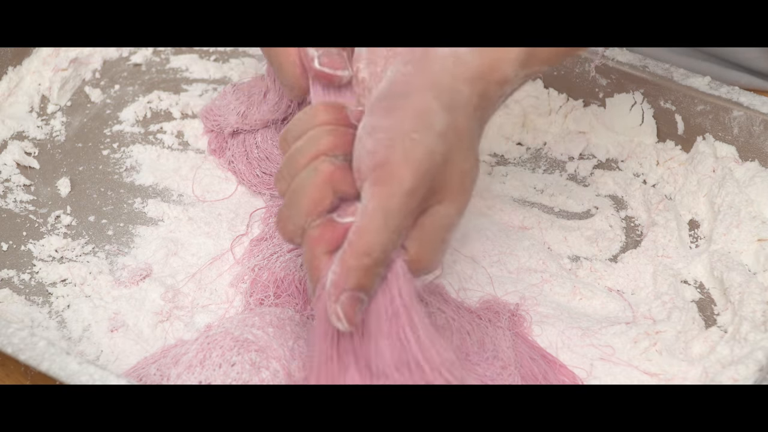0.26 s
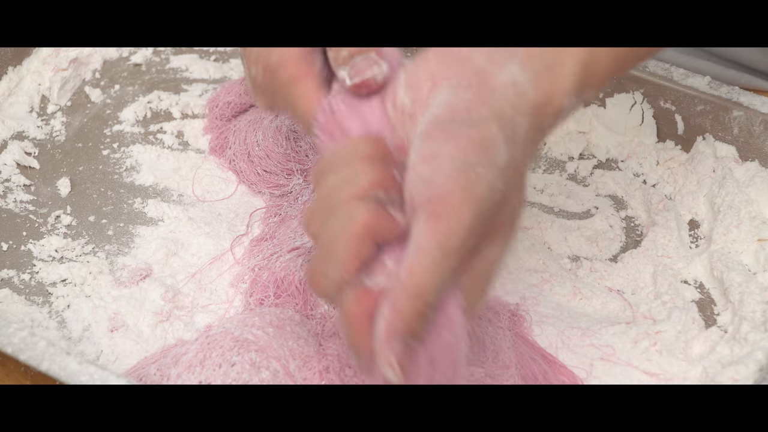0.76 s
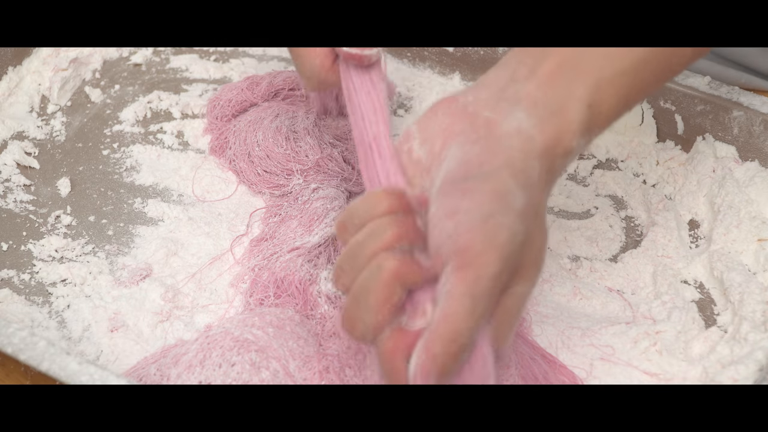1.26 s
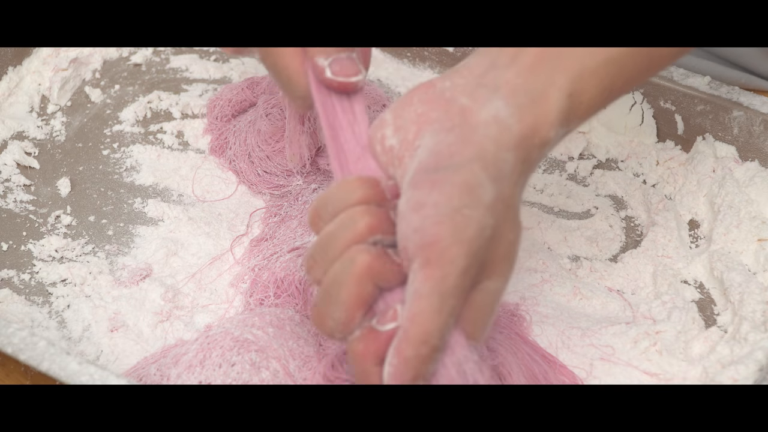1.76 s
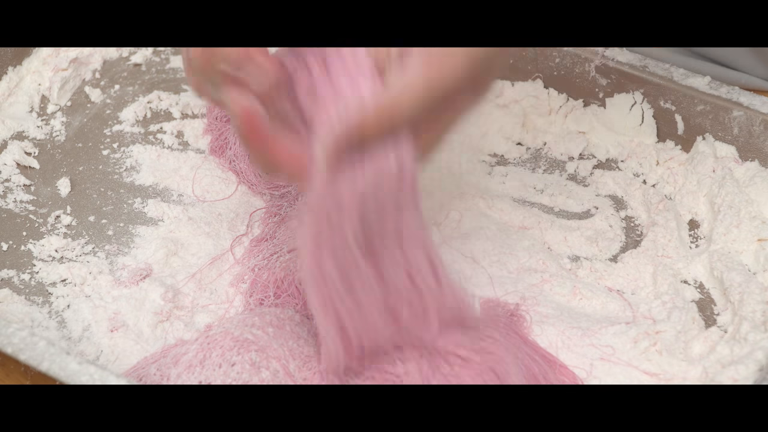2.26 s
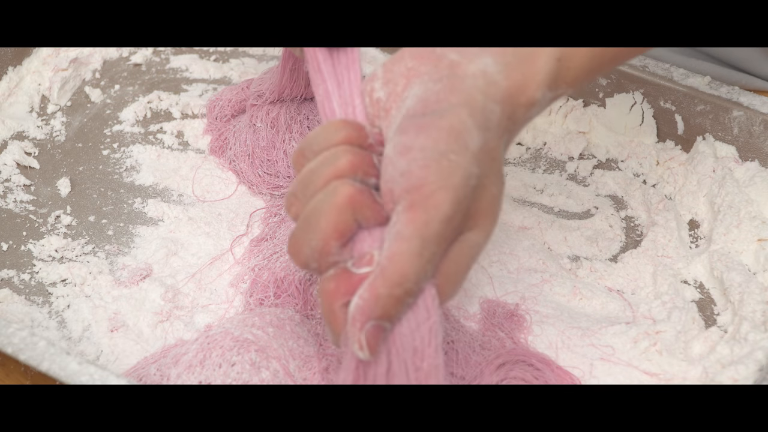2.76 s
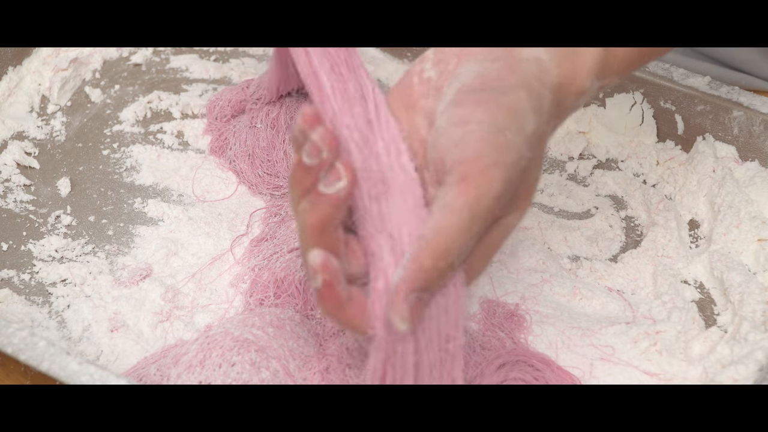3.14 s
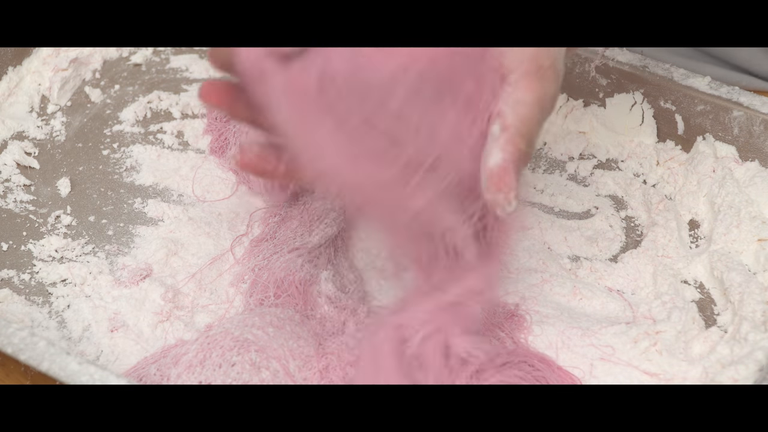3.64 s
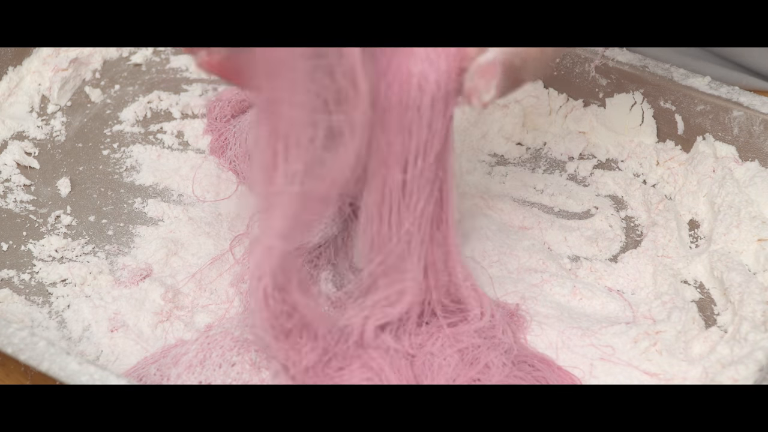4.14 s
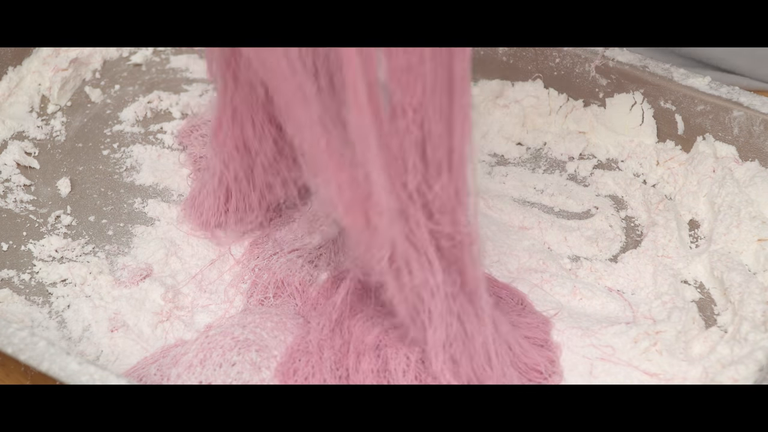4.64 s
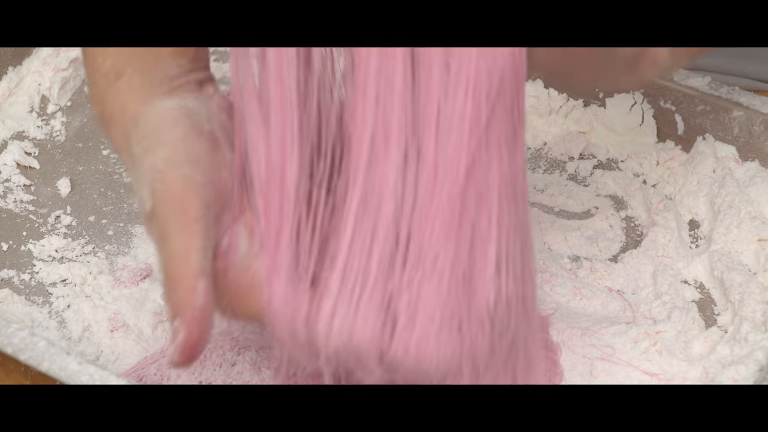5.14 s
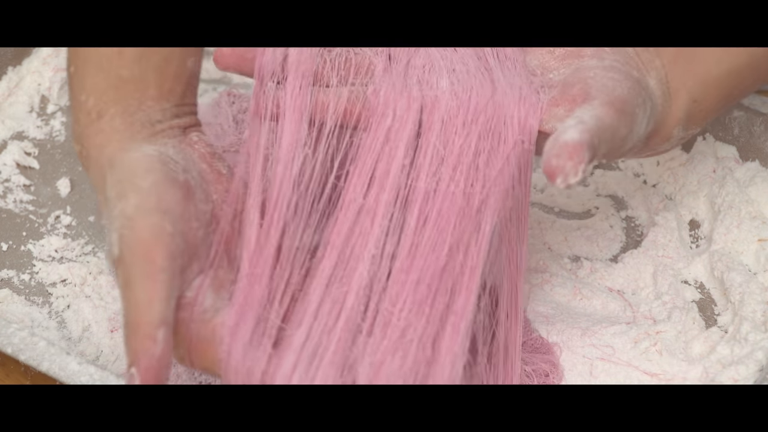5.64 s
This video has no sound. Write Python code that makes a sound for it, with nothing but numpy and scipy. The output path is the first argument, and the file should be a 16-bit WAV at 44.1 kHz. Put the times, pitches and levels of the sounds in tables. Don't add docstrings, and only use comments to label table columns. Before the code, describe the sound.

A quiet indoor kitchen heard closely in mono, with low, soft air and faint mains hum throughout. Hands work fine sugar strands in dry starch: a small tap at 0.07 s, then a sudden bright rub and powdery swish at 0.4 s fading by 0.7. Faint distant bird whistles flutter from 0.7 to 1.2 s with a soft echo. More hissy strokes cluster at 1.5-1.75 s, slightly hollow and squeaky, ending in a clear knuckle tick near 1.8. Another rustling group runs 2.2-2.65 s, with two light taps at its end. At 2.8 s a nearby bird outside dominates: a buzzing trill around 3.6 kHz, then a lower one near 2.8 kHz until 3.2, reverberating about a second. A sharp, dry snap lands at 3.52 s. Gentle swishes and soft air thumps continue around 3.9-4.5 s, then nearly nothing but faint dull scraping, a tiny tap at 5.4 and slightly rising hum.

```python
import sys
import numpy as np
from scipy import signal
from scipy.fft import rfft, irfft
from scipy.io import wavfile
from scipy.ndimage import map_coordinates

SR = 44100
rng = np.random.default_rng(int(sys.argv[2]) if len(sys.argv) > 2 else 0)


def makeup_ratio(level_db):
    decades = np.asarray(level_db, float) / 20
    return 10 ** decades


def to_wav(sig):
    pcm = np.clip(np.atleast_2d(sig), -1, 1) * 32767
    pcm = np.round(pcm).astype(np.int16)
    wavfile.write(sys.argv[1], SR, pcm.T)


N = 260631

# (frequency [Hz], density [dB per Hz])
ROOM_SPECTRUM = [(15, -35), (28, -15), (45, -3), (80, -2), (160, -1), (250, -2.5), (340, -5.5),
                 (480, -12.5), (700, -16), (1200, -16.5), (2200, -22.5), (4500, -24.5), (8000, -27.5),
                 (16000, -32)]
ROOM_DB = -60.5
# (time [s], level [dB])
ROOM_DRIFT = [(0.0, -68.5), (0.28, -71), (0.57, -64.5), (1.36, -68), (1.71, -61), (1.89, -67), (3.26, -67),
              (3.56, -62.5), (4.79, -66), (5.27, -68.5), (5.53, -66.5), (5.91, -70)]
# (frequency [Hz], width [Hz], level [dB])
HUM_LINES = [
    (51.6, 10.4, -67.5),
    (100.2, 5.1, -68),
    (150, 7.2, -75.5),
    (5300, 120, -89.5),
]
# (time [s], level [dB])
HUM_SWELL = [(0, -1.5), (2, 0), (4.5, -0.5), (4.9, 3), (5.91, 4.5)]

# (frequency [Hz], density [dB per Hz])
DRAG_SPECTRUM = [(200, -120), (300, -6), (450, 3.5), (750, 0), (1100, -5), (1500, -120)]
# (peak time [s], level [dB], rise over 10 dB [s], fall over 10 dB [s])
DRAGS = [(-0.01, -66.7, 0.1, 0.202), (0.449, -62.7, 0.115, 0.092), (0.621, -67.5, 0.029, 0.126),
         (0.854, -65.2, 0.059, 0.212), (1.333, -68.6, 0.031, 0.2), (1.805, -64.0, 0.293, 0.052),
         (1.931, -70.2, 0.117, 0.197), (2.25, -68.7, 0.113, 0.258), (2.56, -66.9, 0.176, 0.199),
         (3.021, -70.9, 0.106, 0.15), (3.562, -69.1, 0.193, 0.314), (4.156, -67.4, 0.124, 0.085),
         (4.655, -71.5, 0.3, 0.044), (4.998, -68.2, 0.239, 0.319), (5.362, -70.9, 0.05, 0.315)]

# (frequency [Hz], density [dB per Hz])
HISS_SPECTRUM = [(4500, -120), (5500, -16), (6800, 1), (9000, 3), (12500, 1), (15000, 1), (16000, -8)]
# (frequency [Hz], density [dB per Hz])
RUB_SPECTRUM = [(2500, -120), (3000, -5.5), (4200, 0), (5300, -2), (6300, -6.5), (7500, -18), (9000, -120)]
# (frequency [Hz], density [dB per Hz])
RUSTLE_SPECTRUM = [(500, -120), (800, -21), (1200, -10), (1600, -2), (2200, 0), (2800, -2.5), (3400, -11.5),
                   (4200, -120)]
# (peak time [s], level [dB], rise over 10 dB [s], fall over 10 dB [s])
PULLS = [(0.034, -61.9, 0.035, 0.036), (0.152, -70.7, 0.089, 0.107), (0.4, -45.7, 0.042, 0.03),
         (0.5, -58.8, 0.16, 0.013), (0.663, -68.2, 0.112, 0.008), (0.904, -63.0, 0.15, 0.069),
         (0.993, -67.2, 0.024, 0.073), (1.092, -74.4, 0.05, 0.214), (1.353, -62.2, 0.042, 0.073),
         (1.456, -67.4, 0.037, 0.123), (1.663, -63.1, 0.016, 0.192), (1.764, -60.3, 0.022, 0.007),
         (1.933, -78.2, 0.355, 0.405), (2.219, -63.6, 0.059, 0.033), (2.289, -66.5, 0.033, 0.104),
         (2.496, -59.8, 0.026, 0.048), (2.585, -53.7, 0.02, 0.013), (2.654, -69.8, 0.151, 0.199),
         (2.856, -73.2, 0.055, 0.183), (2.998, -56.9, 0.052, 0.032), (3.067, -67.2, 0.19, 0.076),
         (3.334, -65.3, 0.015, 0.071), (3.569, -66.0, 0.095, 0.048), (3.663, -69.8, 0.353, 0.2),
         (3.973, -68.8, 0.051, 0.097), (4.144, -70.3, 0.121, 0.148), (4.304, -76.1, 0.011, 0.014),
         (4.777, -70.1, 0.025, 0.02), (4.949, -73.3, 0.381, 0.45), (5.317, -84.2, 0.378, 0.109)]
# (peak time [s], level [dB], rise over 10 dB [s], fall over 10 dB [s])
SWISHES = [(0.396, -46.5, 0.009, 0.114), (0.516, -54.2, 0.063, 0.074), (0.63, -62.6, 0.069, 0.007),
           (0.673, -59.8, 0.077, 0.059), (0.8, -65.2, 0.038, 0.031), (0.915, -71.6, 0.072, 0.064),
           (1.007, -67.7, 0.009, 0.039), (1.462, -63.2, 0.127, 0.147), (1.523, -52.2, 0.009, 0.026),
           (1.644, -49.7, 0.072, 0.013), (1.711, -53.5, 0.059, 0.086), (2.213, -60.9, 0.008, 0.106),
           (2.28, -60.5, 0.019, 0.095), (2.389, -53.2, 0.099, 0.018), (2.453, -54.7, 0.037, 0.039),
           (2.549, -55.6, 0.081, 0.054), (3.05, -62.2, 0.024, 0.075), (3.281, -58.1, 0.056, 0.03),
           (3.378, -57.8, 0.025, 0.029), (3.503, -66.3, 0.024, 0.047), (3.626, -62.8, 0.075, 0.033),
           (3.741, -63.1, 0.034, 0.052), (3.908, -56.8, 0.02, 0.018), (3.972, -60.0, 0.032, 0.034),
           (4.087, -54.5, 0.011, 0.018), (4.207, -67.4, 0.267, 0.157), (4.364, -68.5, 0.03, 0.013),
           (4.537, -57.6, 0.032, 0.048), (4.776, -66.9, 0.007, 0.162), (5.928, -67.9, 0.099, 0.01)]
STROKE_ROUND = 1.67

# (time [s], peak level [dB], knock above it [dB], tick frequency [Hz])
TAPS = [(.0678, -44.5, -4, 1900), (0.2899, -45, -22, 1950), (1.7852, -36.5, -9.5, 1700),
        (1.975, -50, -25, 2200), (1.9943, -45, -20, 2300), (2.073, -68, -8, 1200), (2.571, -40, -18, 2360),
        (2.6178, -37, -10.5, 1750), (5.41, -60, -1, 1390)]
# (start [s], end [s], open [Hz], closed [Hz], level over the pull [dB])
CLOSINGS = [(.42, .55, 2300, 2800, 2.5), (1.42, 1.59, 2000, 1960, 5), (1.6, 1.79, 1950, 2580, 5.5),
            (1.79, 1.93, 1150, 1400, 4), (2.19, 2.62, 1750, 2250, 2.5), (2.93, 3.04, 1900, 2400, 3),
            (3.53, 3.75, 1800, 1500, 1.5), (4.82, 5.06, 1500, 2500, -.5)]
# (time [s], peak level [dB], frequency [Hz])
PUFFS = [(0.491, -61, 35), (.86, -52, 60), (1.519, -47.5, 65), (1.64, -52, 45.4), (2.346, -47, 49.6),
         (3.511, -57, 45), (3.905, -48.5, 64.4), (4.077, -42, 80), (4.28, -49, 60.5)]

# (time [s], length [s], start pitch [Hz], end pitch [Hz], level [dB])
WHISTLES = [(.725, 0.034, 3330, 3510, -61), (.77, .07, 3460, 3460, -64), (0.728, 0.024, 3900, 4020, -62),
            (0.845, .02, 2850, 2940, -59), (.855, 0.052, 3030, 3240, -54), (.89, 0.05, 3550, 3770, -61),
            (0.923, .05, 3720, 3600, -59), (.915, 0.054, 3520, 3430, -58), (0.911, .03, 2890, 2950, -60),
            (.94, 0.043, 3300, 3054, -55.5), (.985, 0.052, 3280, 2950, -63), (1.045, 0.04, 2920, 2590, -58),
            (1.045, .025, 2920, 2890, -58), (1.1, .03, 3200, 3170, -65), (1.096, 0.03, 2570, 2780, -62),
            (1.12, 0.06, 2770, 2720, -63), (1.124, 0.085, 2230, 2320, -70), (4.86, .04, 2650, 2500, -68),
            (5.06, 0.11, 3740, 3700, -68)]
# (time [s], pitch [Hz], level [dB], trill swing [Hz])
HIGH_NOTE = [(2.74, 3370, -100, 50), (2.752, 3380, -46, 60), (2.77, 3430, -38, 80), (2.79, 3507, -32, 121),
             (2.822, 3650, -24, 230), (2.86, 3657, -27, 255), (2.90, 3600, -31.5, 218),
             (2.94, 3680, -37.5, 180), (2.96, 3680, -100, 180)]
# (time [s], pitch [Hz], level [dB], trill swing [Hz])
UNDER_NOTE = [(2.75, 2750, -100, 150), (2.77, 2750, -46, 230), (2.80, 2800, -39.5, 290),
              (2.85, 2830, -40.5, 340), (2.89, 2980, -43, 330), (2.92, 3050, -100, 250)]
# (time [s], pitch [Hz], level [dB], trill swing [Hz])
LOW_NOTE = [(2.93, 2680, -100, 150), (2.955, 2670, -38, 150), (2.99, 2720, -35.5, 190),
            (3.03, 2850, -29, 200), (3.08, 2860, -28.5, 180), (3.14, 2840, -28.5, 171),
            (3.18, 2780, -29, 170), (3.21, 2723, -32.5, 170), (3.235, 2700, -100, 139.5)]
YARD_T60 = [
    0.97,
    0.96,
    0.78,
]

# (time [s], frequency [Hz], level [dB], decay by 60 dB [s])
SNAP = [(3.5213, 5200, -22, .003), (3.5216, 8710, -23, .002), (3.5213, 13500, -32, .002),
        (3.5214, 1750, -34, .006), (3.5219, 4300, -20.5, .005), (3.5223, 6400, -23.5, .003),
        (3.5227, 12500, -36, .002), (3.5220, 2700, -25.5, .007), (3.5222, 1750, -21.5, 0.0083),
        (3.5224, 480, -38, .014)]


def unit(x):
    return x / np.sqrt(np.mean(x ** 2) + 1e-20)


def curves(rows):
    s, *cols = np.transpose(rows)
    return [np.interp(np.arange(N) / SR, s, c) for c in cols]


def wobble(rate):
    knots = rng.standard_normal(N // 20)
    return map_coordinates(knots, [np.arange(N) * rate / SR])


def coloured(x, points):
    f, db = np.transpose(points)
    hz = np.fft.rfftfreq(N, 1 / SR)
    gain = makeup_ratio(np.interp(np.log(hz + 1), np.log(f), db, -120, -120))
    return unit(irfft(rfft(x) * gain, N))


def add(track, s, sound):
    part = track[round(s * SR):][:len(sound)]
    part += sound[:len(part)]


def ring(hz, t60, t):
    build_up = 1 - np.exp(-1.6 * hz * t)
    return makeup_ratio(-60 * t / t60) * build_up * np.sin(2 * np.pi * hz * t)


def grit(rough_db, clump_db):
    return rng.standard_normal(N) * makeup_ratio(rough_db * wobble(1500) + clump_db * wobble(40))


def swells(rows):
    t = np.arange(N // 32 + 2) * 32 / SR
    power = np.full(len(t), 1e-12)
    for s, db, rise_s, fall_s in rows:
        distance = np.abs((t - s) / np.where(t < s, rise_s, fall_s))
        power += makeup_ratio(db - 10 * distance ** STROKE_ROUND) ** 2
    return np.interp(np.arange(N) / SR, t, power)


def room_tone():
    drift_db, = curves(ROOM_DRIFT)
    level_db = ROOM_DB + 0.32 * (drift_db - drift_db.mean())
    air = makeup_ratio(level_db) * coloured(rng.standard_normal(N), ROOM_SPECTRUM)
    hz = np.fft.rfftfreq(N, 1 / SR)
    hum = np.zeros(N)
    for centre_hz, width_hz, db in HUM_LINES:
        resonance = 1 / (1 + ((hz - centre_hz) / width_hz) ** 2)
        hum += makeup_ratio(db) * unit(irfft(rfft(rng.standard_normal(N)) * resonance, N))
    swell_db, = curves(HUM_SWELL)
    return air + makeup_ratio(swell_db) * hum


def drag():
    return np.sqrt(swells(DRAGS)) * coloured(grit(rough_db=2.0, clump_db=0.2), DRAG_SPECTRUM)


def strokes():
    pull, swish = swells(PULLS), swells(SWISHES)

    def layer(pull_db, swish_db, clump_db, spectrum):
        envelope = np.sqrt(pull * makeup_ratio(pull_db) ** 2 + swish * makeup_ratio(swish_db) ** 2)
        return envelope * coloured(grit(1.5, clump_db), spectrum)

    flutter = makeup_ratio(0.74 * wobble(25.05))
    hiss = layer(pull_db=0.9, swish_db=1.5, clump_db=1.5, spectrum=HISS_SPECTRUM)
    rub = layer(pull_db=4.6, swish_db=-2.7, clump_db=1.1, spectrum=RUB_SPECTRUM)
    rustle = layer(pull_db=3.3, swish_db=-6.7, clump_db=0.75, spectrum=RUSTLE_SPECTRUM)
    return flutter * (hiss + rub + rustle)


def taps():
    out, t = np.zeros(N), np.arange(SR // 20) / SR
    for s, db, knock_db, hz in TAPS:
        tick = ring(hz, 0.0032, t)
        tick += 0.59 * ring(0.46 * hz, 0.0043, t)
        tick += 0.54 * ring(1.36 * hz, 0.0027, t)
        knock = ring(353, 0.015, t)
        add(out, s, -makeup_ratio(db + 9.5) * tick)
        add(out, s - 0.0006, -makeup_ratio(db + knock_db + 13.5) * knock)
    return out


def cupped_hand():
    out = np.zeros(N)
    noise = np.sqrt(2 * swells(PULLS)) * wobble(550)
    for start, end, open_hz, closed_hz, db in CLOSINGS:
        n = round((end - start) * SR)
        hollow = np.sin(np.cumsum(np.linspace(open_hz, closed_hz, n)) * 2 * np.pi / SR)
        rubbing = noise[round(start * SR):][:n]
        add(out, start, makeup_ratio(db) * np.hanning(n) ** 0.2 * hollow * rubbing)
    return out


def puffs():
    out, t = np.zeros(N), np.arange(SR // 10) / SR
    for s, db, hz in PUFFS:
        u = t * hz * 1.74
        swell = u * np.exp(-u)
        add(out, s, -makeup_ratio(db + 7.5) * swell * np.sin(2 * np.pi * hz * t))
    return out


def whistles():
    out = np.zeros(N)
    for s, length, start_hz, end_hz, db in WHISTLES:
        n = round(length * SR)
        hz = end_hz + (start_hz - end_hz) * np.linspace(1, 0, n) ** 1.6
        tone = np.sin(np.cumsum(hz) * 2 * np.pi / SR)
        add(out, s, makeup_ratio(db) * np.hanning(n) ** 0.4 * tone)
    return out


def trill(note, rate_hz, pulse, waver):
    hz, db, swing_hz = curves(note)
    shake = np.cumsum(rate_hz * (1 + 0.22 * wobble(60))) * 2 * np.pi / SR
    pitch_hz = hz + swing_hz * (np.sin(shake) + waver * wobble(120))
    phase = np.cumsum(pitch_hz) * 2 * np.pi / SR
    voice = np.sin(phase) + makeup_ratio(-40.5) * np.sin(2 * phase)
    return makeup_ratio(db) * (1 + pulse * np.cos(shake)) * voice


def yard(x, t60, direct_db):
    t = np.arange(SR * 3 // 2) / SR
    build_up = 1 - np.exp(-t / 0.0067)
    tail = rng.standard_normal(len(t)) * makeup_ratio(-60 * t / t60) * build_up
    echo = signal.fftconvolve(x, tail / np.linalg.norm(tail))[:N]
    return echo + makeup_ratio(direct_db) * x


def birds():
    high = trill(HIGH_NOTE, 110, pulse=0.48, waver=0.2)
    high += trill(UNDER_NOTE, 110, pulse=0.35, waver=0.32)
    low = trill(LOW_NOTE, 80, pulse=0.3, waver=0.4)
    high_t60, low_t60, far_t60 = YARD_T60
    return yard(high, high_t60, -5.5) + yard(low, low_t60, -6) + yard(whistles(), far_t60, -2)


def snap():
    out, t = np.zeros(N), np.arange(SR // 40) / SR
    for s, hz, db, t60 in SNAP:
        add(out, s, makeup_ratio(db) * ring(hz, t60, t))
    return out


def scene():
    hands = drag() + strokes() + taps() + cupped_hand() + puffs() + snap()
    return (room_tone() + hands + birds())[None]


def low_pass(x):
    return signal.sosfilt(signal.butter(12, 16660, fs=SR, output="sos"), x)


def record(dry):
    passed = np.fft.rfftfreq(N, 1 / SR) < 15790
    kept = irfft(rfft(dry) * passed, N)
    return low_pass(kept)


dry = scene()
out = record(dry)
to_wav(out)
```